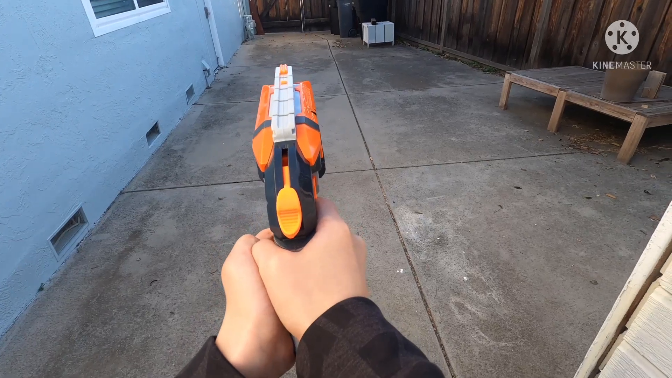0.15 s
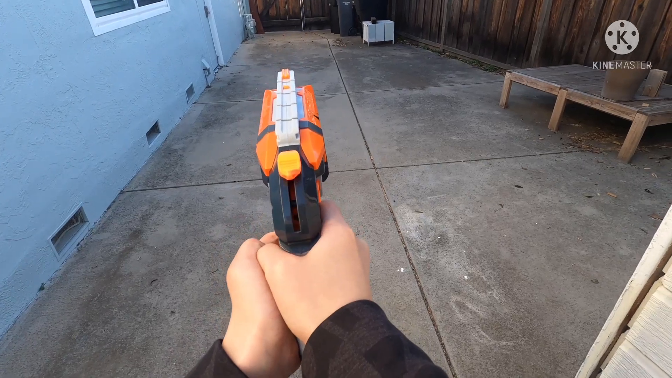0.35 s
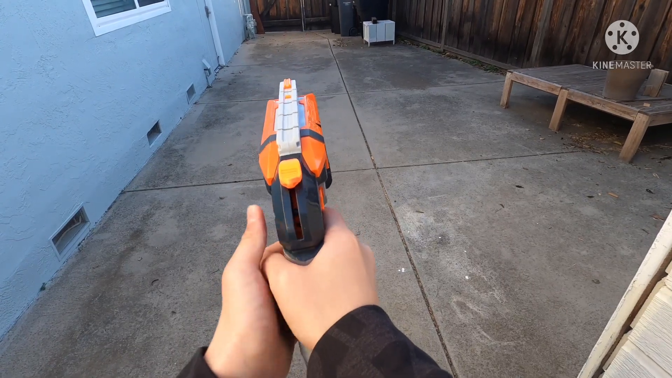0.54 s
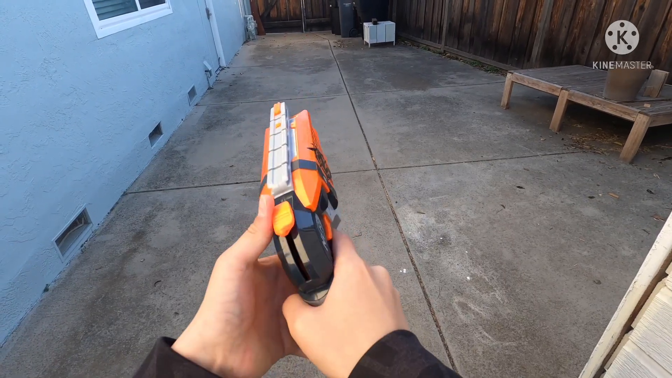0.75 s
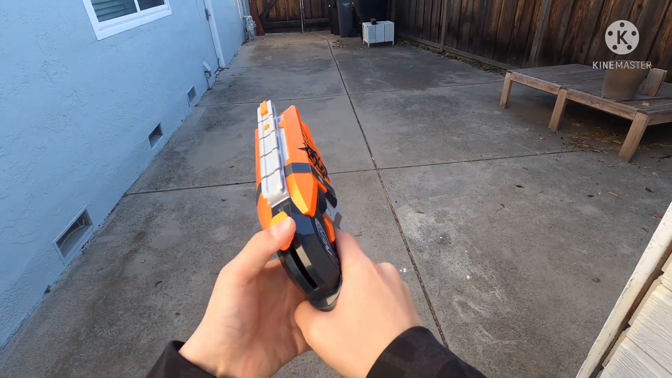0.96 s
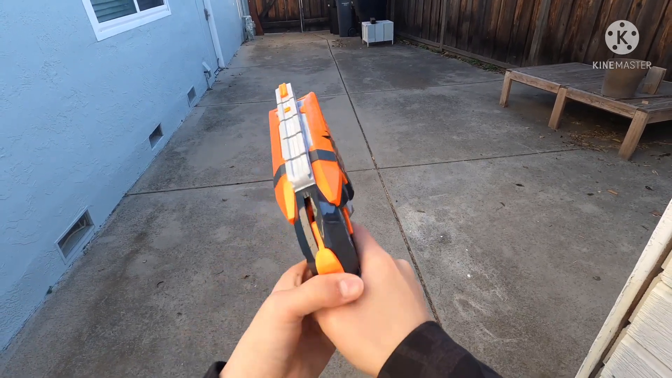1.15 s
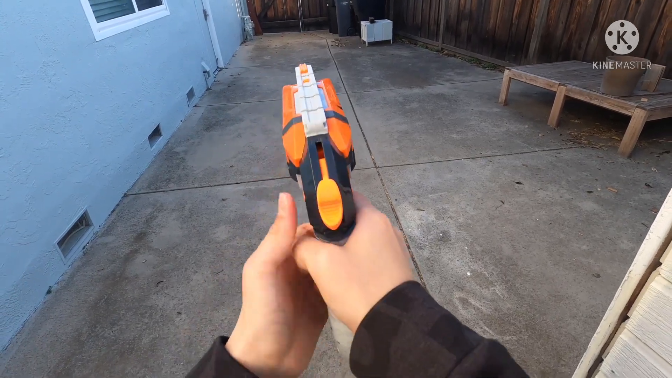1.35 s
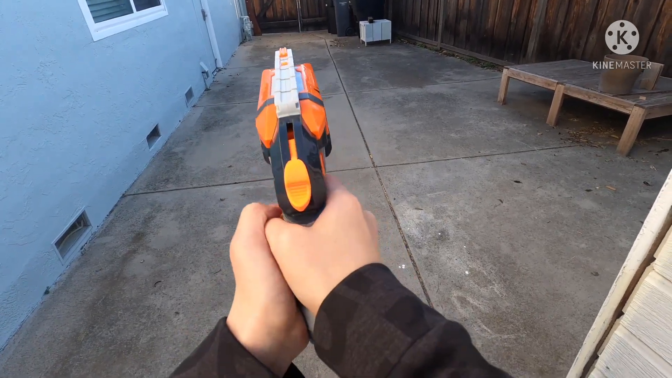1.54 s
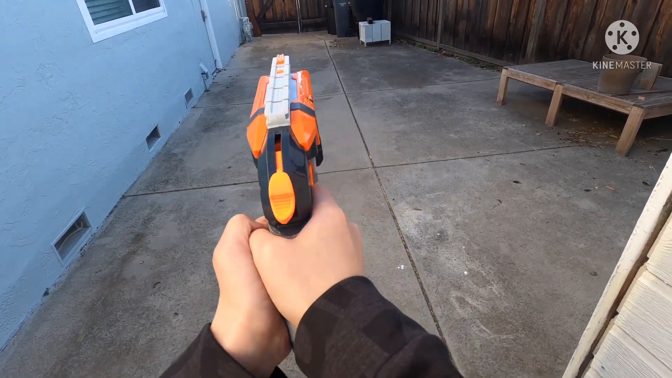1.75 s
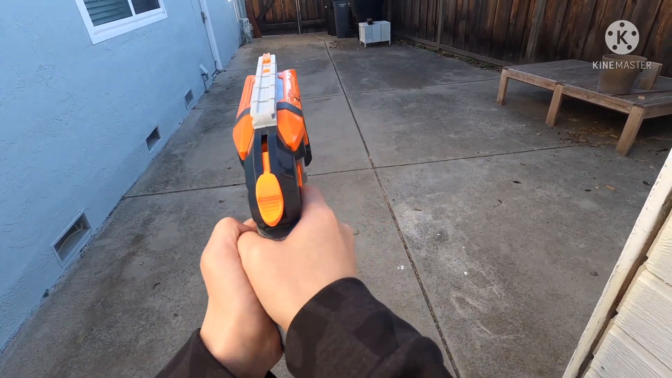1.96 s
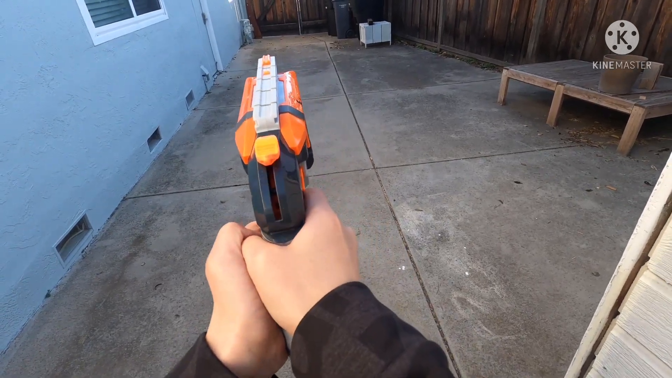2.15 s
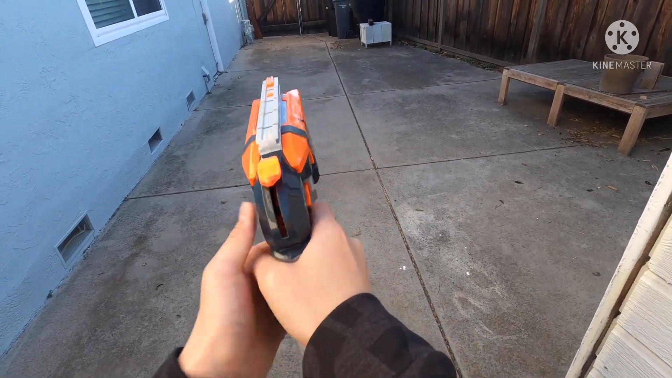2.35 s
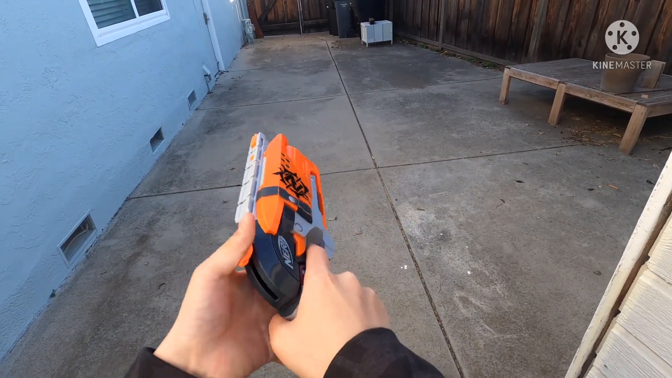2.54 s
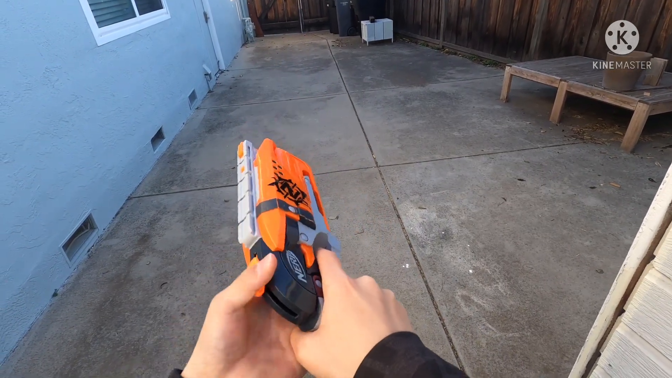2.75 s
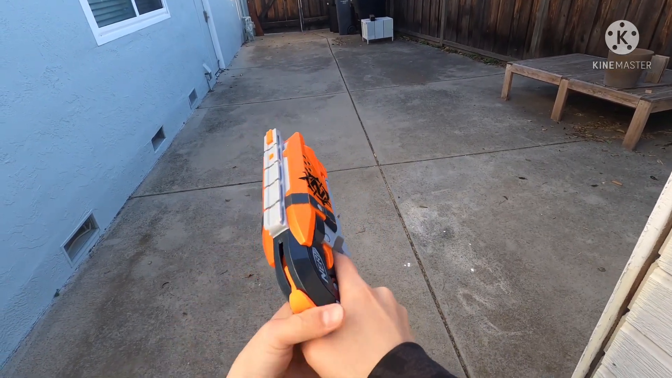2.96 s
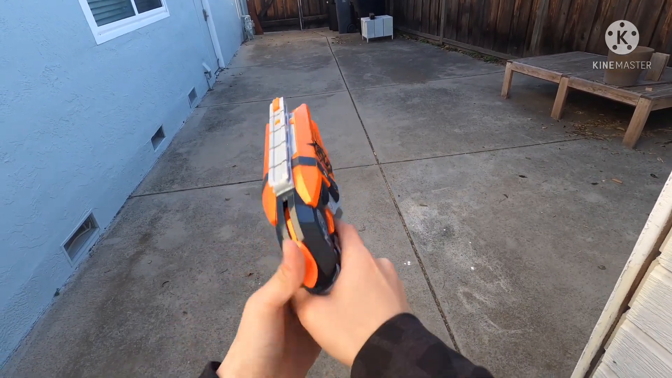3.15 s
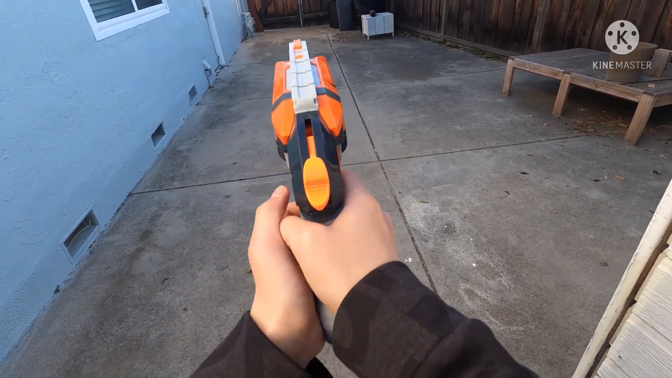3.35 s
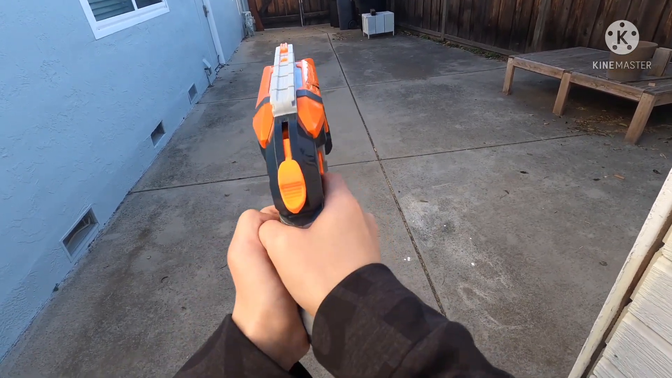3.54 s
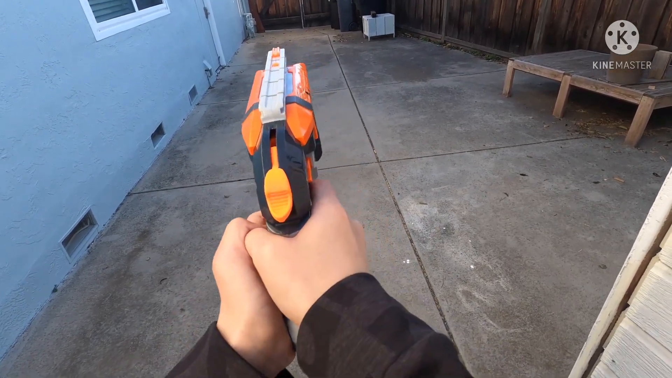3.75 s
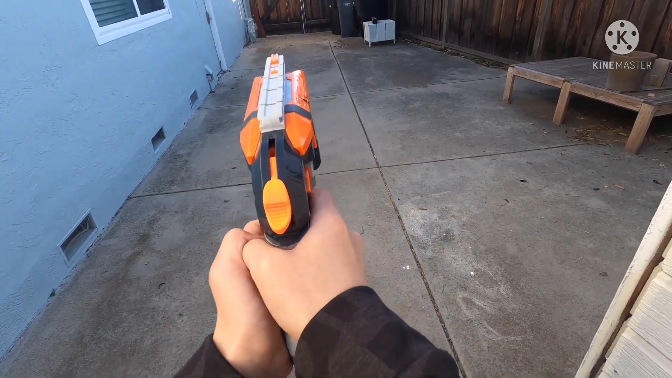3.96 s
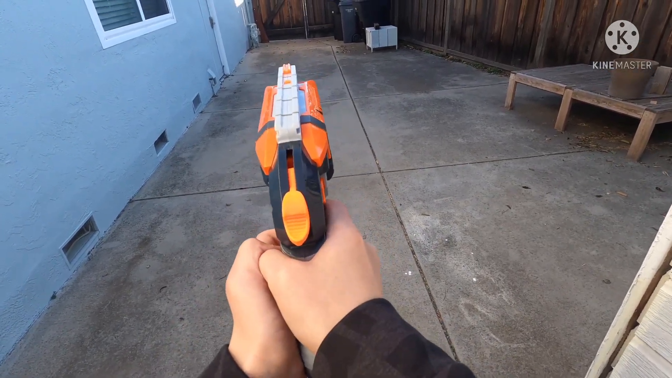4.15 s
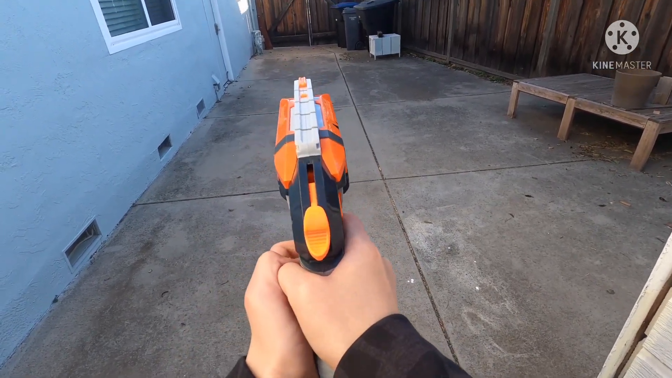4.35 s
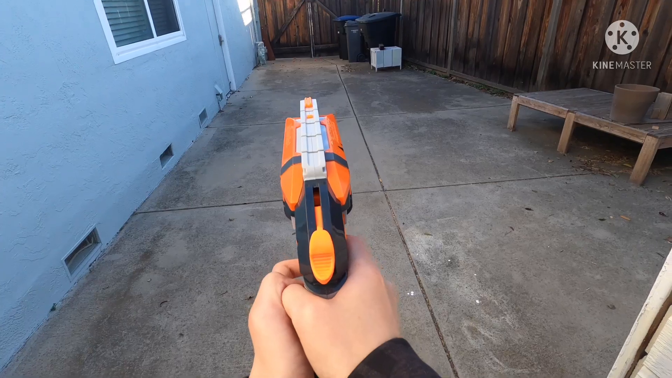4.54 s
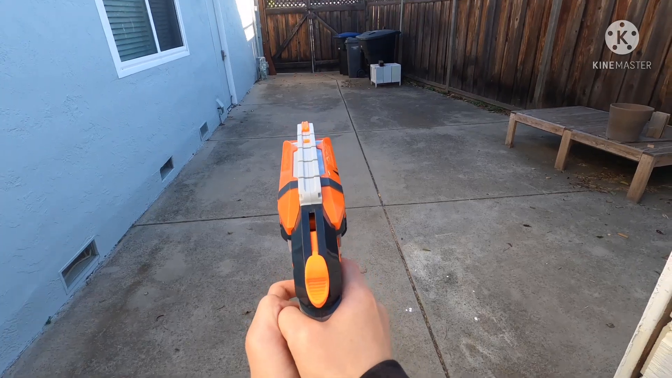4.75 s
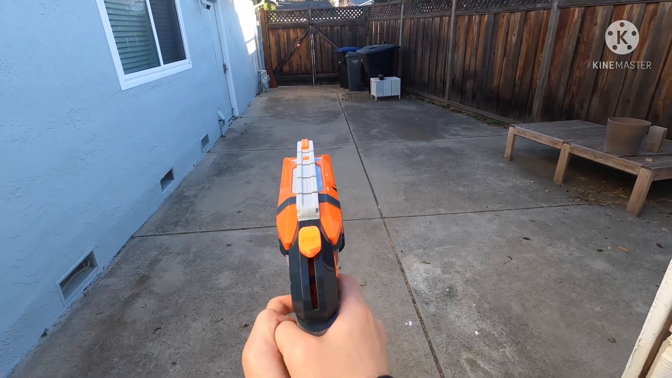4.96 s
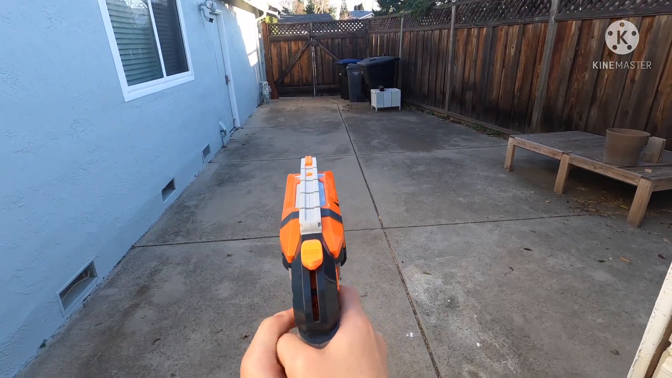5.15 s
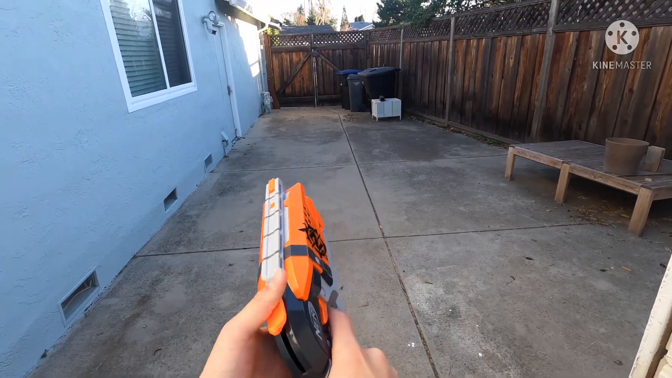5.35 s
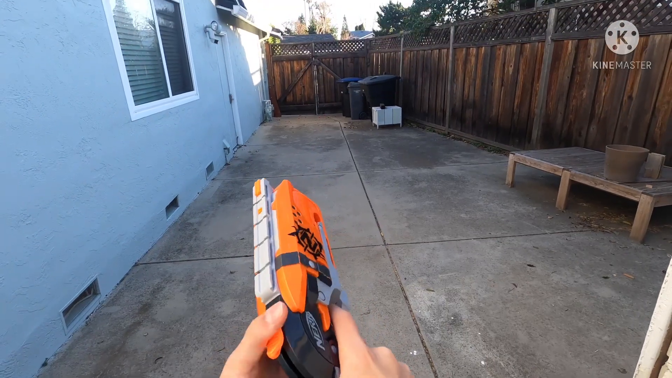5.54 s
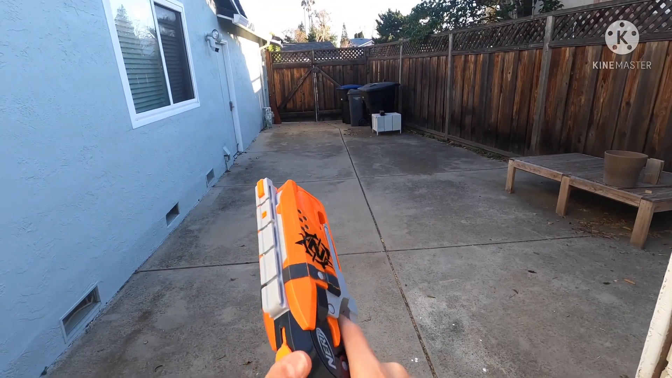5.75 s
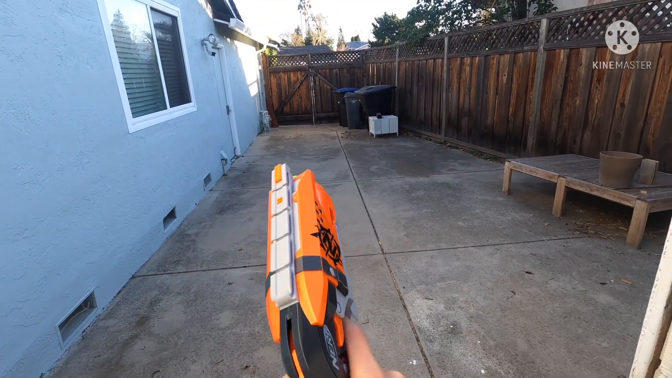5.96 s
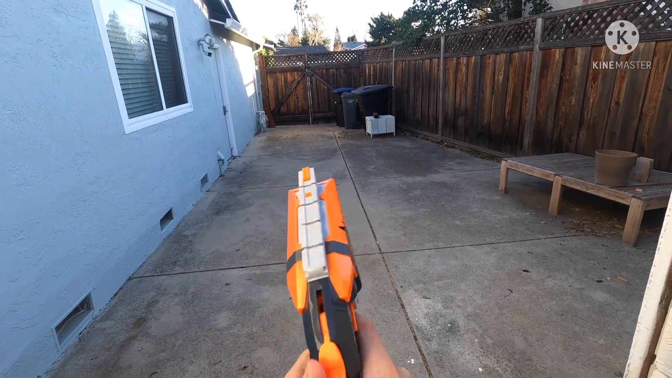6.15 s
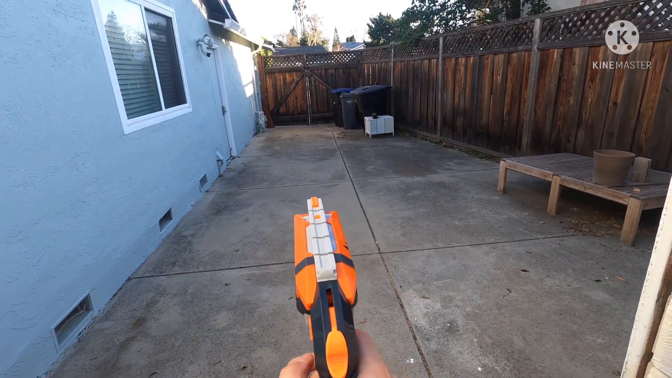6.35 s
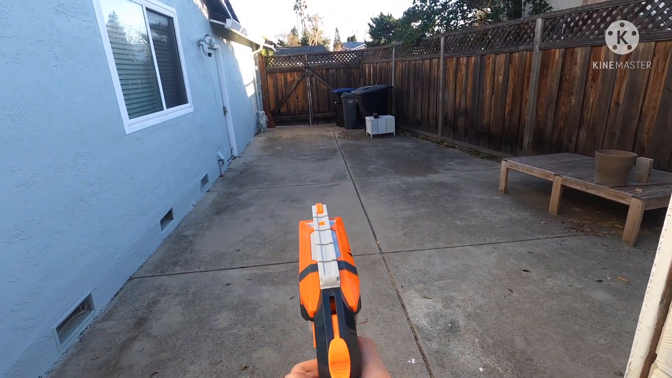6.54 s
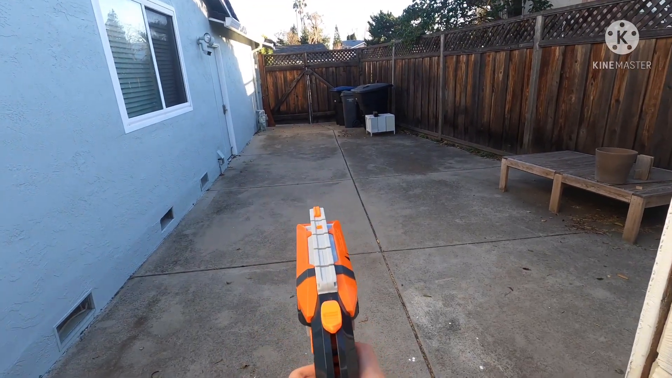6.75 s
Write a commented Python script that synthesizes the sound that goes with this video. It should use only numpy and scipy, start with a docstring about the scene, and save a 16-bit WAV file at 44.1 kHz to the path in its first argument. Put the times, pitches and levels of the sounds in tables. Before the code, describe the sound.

A plastic dart blaster at arm's length, slightly right of a stereo microphone: four loud snaps, each a crack, low puff and plunger slam almost fused. After each of the first three, soft grip rubbing, small rattles, a short rasping pull and a bright clack. A wall on the left and fences return brief, diffuse echoes over quiet distant traffic.

```python
"""A spring-powered foam-dart blaster is fired four times and cocked three times, at arm's length in a paved yard.
Each shot is a sear crack, a pulse of pumped air and the slam of the plunger, made of noise bursts and shell modes.
The slide groans and scrapes by stick and slip, then latches; parts knock lightly and hands rub the grip.
House wall and fence answer as decaying noise, over a town of filtered noise and drones, and one bird chirp.
A microphone pair hears the blaster slightly to its right and the house wall on its left."""
import sys
import numpy as np
from scipy import signal
from scipy.fft import rfft, irfft, next_fast_len
from scipy.io import wavfile
from scipy.ndimage import uniform_filter1d

SR = 44100
rng = np.random.default_rng(int(sys.argv[2]) if len(sys.argv) > 2 else 0)


def materialize(psi):
    """Save the field psi as 16-bit PCM at rate SR to the path in sys.argv[1].

    A 1-D psi becomes a single channel; in a 2-D psi each row is a channel.
    """
    bounded = np.clip(np.atleast_2d(psi).T, -1, 1)
    quanta = np.round(bounded * 32767).astype(np.int16)
    wavfile.write(sys.argv[1], SR, quanta)


N = 304287
TIME = np.arange(N) / SR  # seconds of the whole scene
BLOW = np.arange(4096) / SR  # seconds of one short blow

# Shots: start_s, crack_db, plunger_stop_db
SHOT_EVENTS = [(0.3789, -9.5, -14), (2.203, -9, -14.5), (5.0293, -9, -18), (6.7229, -11.5, -17)]
# Spectra of the sear's crack, the plunger's stop and small plastic ticks: freq_hz, level_db
CRACK_SPECTRUM = [(100, -18.5), (700, -19.5), (1300, -1), (2000, 3.5), (3200, -1.5), (5000, -0.5),
                  (9000, -15), (12000, -20), (16000, -32)]
SLAM_SPECTRUM = [(100, -13.5), (280, -8.5), (400, 4.5), (500, -5.5), (850, 6), (1300, 3.5), (2000, -3.5),
                 (3500, -3), (6000, -10.5), (9000, -13), (12000, -20.5), (16000, -43.5)]
TICK_SPECTRUM = [(100, -17), (500, -22.5), (1200, 7), (2200, 1), (3500, 0), (6000, -5), (9000, -12.5),
                 (12000, -26.5), (16000, -31.5)]
LEAD_IN_S = .03  # length of the swelling noise before the crack
TRAVEL_S = .0093  # from the crack to the plunger's stop


def shots(trigger_db=-24, rush_db=-20, lead_in_db=-33):
    """A faint noise swells into each crack of the sear; the trigger ticks, the plunger rushes and is stopped dead."""
    out = np.zeros((2, N))
    air = air_pulse()
    for s, crack_db, slam_db in SHOT_EVENTS:
        add(out, s - LEAD_IN_S, undb(lead_in_db) * lead_in(LEAD_IN_S, 0.0075))
        add(out, s - .005, undb(trigger_db) * knock(TICK_SPECTRUM, 0.0022, -15, .005, 0))
        add(out, s, undb(crack_db) * knock(CRACK_SPECTRUM, 0.0011, -22, .007, -4.0))
        hiss = unit(colour(pair(len(BLOW), 11000), SLAM_SPECTRUM))
        add(out, s + 0.003, undb(rush_db) * swell(0.0065) * hiss)
        add(out, s, air)
        add(out, s + TRAVEL_S, undb(slam_db) * knock(SLAM_SPECTRUM, 0.00065, -14.5, 0.0099, -8))
    return out


def air_pulse(air_hz=142, air_db=-11.0):
    """The pumped air swings about twice in the barrel; the plunger's dead stop adds a sharp suction."""
    out = np.zeros((2, N))
    swing = swell(.0052) * np.sin(2 * np.pi * air_hz * BLOW)
    add(out, .0026, -undb(air_db) * swing)
    add(out, TRAVEL_S, -undb(-5) * swell(.00045))
    return out[:, :len(BLOW)]


# Pulls of the slide: start_s, latch_s, seal_groan_db, rail_scrape_db, catch_db
SLIDE_PULLS = [(1.138, 1.2974, -22, -43.5, -17.5), (2.965, 3.0886, -39, -47, -17),
               (5.819, 6.0799, -33, -53.5, -15)]
# Places where the slide binds and rasps: start_s, length_s, level_db
RASP_EVENTS = [(1.213, 0.014, -36), (1.338, 0.048, -43), (2.959, 0.047, -40.5), (5.988, 0.049, -43.5),
               (6.196, 0.015, -36.5)]
# Spectra of the juddering seal and the scraping rails: freq_hz, level_db
SEAL_SPECTRUM = [(80, -8.5), (200, -2.5), (380, -1.5), (700, -9.5), (1050, 6.5), (1500, -2), (1900, -11),
                 (3000, -20), (8000, -46.5)]
RAIL_SPECTRUM = [(150, -19.5), (450, -11), (600, 7), (800, -10), (1200, 7.5), (1600, 5.5), (2200, -1.5),
                 (3100, -3.5), (3480, 0), (3950, -6), (4500, -4), (5200, -5.5), (9000, -17.5),
                 (12000, -23.5), (16000, -38)]
GRAB_S, SEAL_FALL_DB_PER_S, SEAL_GLIDE_DB = 0.0025, 151.5, -20  # the seal breaks loose, then glides more quietly
STRAIN_DB, STRAIN_S = 15.5, 0.013  # extra scrape and its 1/e time either side of the latch
RETURN_S, RELEASE_S = 0.062, 0.026  # the slide runs on after the latch, then comes to rest


def slide(rasp_attack_s=0.0014, rasp_release_s=0.0089, breakaway_db=1):
    """The seal tocks loose and judders in the air tube; the rails scrape hardest at full spring load and bind."""
    seal = slips(520, 1.2, SEAL_SPECTRUM, 0.0011, -3.5, uneven=.25)
    rail = through_shell(slips(260, 2.6, RAIL_SPECTRUM, 0.0028, 11.0))
    groan, scrape = np.zeros((2, N))
    tocks = np.zeros((2, N))
    for start, latch, seal_db, rail_db, _ in SLIDE_PULLS:
        add(tocks, start, undb(seal_db + breakaway_db) * knock(SEAL_SPECTRUM, 0.0018, -16, .008, -8.5))
        moving = gate(start, latch + RETURN_S, GRAB_S, RELEASE_S)
        loosening = undb(-SEAL_FALL_DB_PER_S * np.maximum(TIME - start, 0))
        groan += moving * undb(seal_db) * np.hypot(loosening, undb(SEAL_GLIDE_DB))
        strain = 1 + undb(STRAIN_DB) * np.exp(-np.abs(TIME - latch) / STRAIN_S)
        scrape += moving * undb(rail_db) * strain
    for start, length, db in RASP_EVENTS:
        scrape += undb(db) * gate(start, start + length, rasp_attack_s, rasp_release_s)
    return tocks + seal * groan + rail * scrape


# Spectrum of the catch dropping in: freq_hz, level_db
LATCH_SPECTRUM = [(100, -17), (400, -16), (650, -2.5), (1300, 5.5), (2200, -7), (3500, 4), (5000, -7.5),
                  (9000, -13), (12000, -16.5), (16000, -34)]
RAMP_LEAD_S, REBOUND_S, SETTLE_S = 0.02, .0092, .026  # blows before and after the catch


def latches(ramp_db=-13, rebound_db=-2.0, settle_db=-11):
    """The catch ticks onto its ramp and drops in; the spring throws the plunger back at it, and it settles."""
    out = np.zeros((2, N))
    for _, s, _, _, db in SLIDE_PULLS:
        add(out, s - RAMP_LEAD_S, undb(db + ramp_db) * knock(TICK_SPECTRUM, .002, -11.5, .007, -2.5))
        catch = knock(LATCH_SPECTRUM, 0.0021, -18.5, 0.0095, -8.5, build_s=0.00027)
        add(out, s, undb(db) * catch)
        add(out, s + REBOUND_S, undb(db + rebound_db) * knock(LATCH_SPECTRUM, 0.00097, -9, .008, -2.0))
        add(out, s + SETTLE_S, undb(db + settle_db) * knock(TICK_SPECTRUM, .0015, -13.5, 0.0078, 2.5))
    return out


# Plastic knocks of slide, trigger and grip: start_s, peak_db, treble_share_db
CLICK_EVENTS = [(0.731, -45, -8.5), (0.819, -32, -14), (0.8432, -42.5, -3), (1.0998, -43, -7),
                (1.1239, -34, -3), (1.189, -30.5, -2.5), (1.2426, -29.5, -5.5), (1.381, -31, -16),
                (1.405, -34.5, -11), (1.5794, -38, -9.5), (2.1135, -41, -21), (2.5175, -38, -13),
                (2.639, -39.5, -11.5), (2.6664, -44, -15.5), (2.8291, -35, -16), (2.908, -38.5, -26),
                (2.9301, -28.5, -24.5), (3.028, -33, -23), (3.1954, -29.5, -12.5), (3.2147, -30, -16),
                (3.3255, -36, -7), (3.381, -37.5, -22), (3.6522, -42, 21), (4.9055, -27, -6),
                (5.4874, -48, -30), (5.581, -35.5, -8.5), (5.715, -48, -23.5), (5.803, -32.5, -13.5),
                (5.8348, -38, 10), (5.908, -27, -32.5), (5.9417, -35.5, -6.5), (6.0192, -30.5, 5),
                (6.0483, -29, -10), (6.1367, -25.5, -14), (6.214, -28.5, -23), (6.2331, -33, -15),
                (6.3178, -32.5, -8.5)]


def clicks(usual_db=-6, lead_in_db=-19, lead_in_s=0.0087):
    """Small blows on plastic, each led in by a brief, faint swell of noise; a harder contact is brighter."""
    out = np.zeros((2, N))
    for s, db, treble_db in CLICK_EVENTS:
        blow = knock(TICK_SPECTRUM, 0.001428, -13.0, .007, -5.5, build_s=0.00025)
        # a larger treble share lowers everything below 1600 Hz
        blow = colour(blow, [(1600, usual_db - treble_db), (5000, 0.013)])
        add(out, s, undb(db) * peak(blow))
        add(out, s - lead_in_s, undb(db + lead_in_db) * lead_in(lead_in_s, 0.0062))
    return out


# Hands shifting on the grip: start_s, end_s, level_db
HAND_SHIFTS = [(0.62, 0.897, -65.5), (1.03, 1.451, -60), (2.504, 2.954, -65), (3.19, 3.616, -65),
               (5.297, 5.805, -62.5), (6.217, 6.473, -70)]
# Spectrum of skin rubbing on plastic: freq_hz, level_db
SKIN_SPECTRUM = [(150, -10), (600, -1.5), (1400, 5), (3000, -12.5), (6000, -19.5), (12000, -30.5)]


def hands(tick_db=12, scatter_db=2.0, count=3):
    """Skin rubs softly on the grip as the hands shift, and loose parts tick a few times."""
    touch = np.zeros(N)
    for start, end, db in HAND_SHIFTS:
        touch += undb(db) * np.clip(np.minimum(TIME - start, end - TIME) / 0.051, 0, 1)
    pressure = undb(5.2 * wander(count=200))
    out = touch * pressure * slips(160, 3.2, SKIN_SPECTRUM, 0.0044, 16)
    for start, end, db in HAND_SHIFTS:
        for k in range(count):
            s = start + (end - start) * (k + rng.random()) / count
            level_db = db + tick_db + scatter_db * rng.standard_normal()
            add(out, s, undb(level_db) * knock(TICK_SPECTRUM, 0.0015, -25.5, .006, -1.5))
    return out


# Spectrum of the sound returned by the yard: freq_hz, level_db
YARD_SPECTRUM = [(50, -22.5), (130, -3), (300, 0.5), (700, 8.5), (1300, 2.5), (2500, 4.5), (5000, 0),
                 (8000, 0), (12000, -6.5), (16000, -28.5)]


def yard(x, low_t60=0.47, high_t60=0.38, near_db=-16, far_db=-20.0, near_s=0.018, build_s=0.079):
    """Ground and house wall scatter early; the fences answer later and keep the sound going."""
    t = np.arange(SR) / SR
    noise = pair(SR, 2800)
    low = signal.sosfilt(signal.butter(1, 2500, fs=SR, output="sos"), noise)
    decay = low * undb(-60 * t / low_t60) + (noise - low) * undb(-60 * t / high_t60)
    far = decay * np.minimum(t / build_s, 1) ** 2
    near = pair(SR, 4000) * np.exp(-t / near_s) * (t > .009)
    both = undb(near_db) * unit(near) + undb(far_db) * unit(far)
    response = colour(both, YARD_SPECTRUM) / np.sqrt(SR)
    return signal.fftconvolve(x, response, axes=1)[:, :N]


def wall_echo(x, echo_db=-15, lag_s=0.036, again_db=-8, dull_hz=220):
    """The bass of a shot bounces between house and fence: one return, then a weaker one."""
    out = np.zeros((2, N))
    bass = undb(echo_db) * signal.sosfilt(signal.butter(2, dull_hz, fs=SR, output="sos"), x)
    add(out, lag_s, bass)
    add(out, lag_s + .034, undb(again_db) * bass)
    return out


CHIRP_S, CHIRP_LENGTH_S, CHIRP_HZ, CHIRP_DROP_HZ, CHIRP_DB = 1.536, 0.095, 5540, 1400, -56.5


def bird(echo_db=16, waver=.03, flutter_db=4.5):
    """One chirp from beyond the fence: a wavering sine falling ever faster, mostly echo."""
    age = np.clip((TIME - CHIRP_S) / CHIRP_LENGTH_S, 0, 1)
    hz = (CHIRP_HZ - CHIRP_DROP_HZ * age ** 1.7) * (1 + waver * age * wander(count=5000))
    loudness = undb(CHIRP_DB + flutter_db * wander(count=3000)) * np.sin(np.pi * age) ** 2
    note = loudness * np.sin(2 * np.pi * np.cumsum(hz) / SR)
    echo = yard(note[None], low_t60=.36, high_t60=0.43, near_db=-14, build_s=.05)
    return note + undb(echo_db) * echo


# Spectrum of the distant town: freq_hz, level_db
TOWN_SPECTRUM = [(15, -29.5), (25, 0), (41, 5.5), (60, -3), (87, -1), (129, -12), (164, -13.5), (192, -22),
                 (372, -23), (414, -26.5), (498, -29), (703, -34), (1260, -30), (1820, -40.5), (2940, -48),
                 (4370, -59.5), (14000, -82)]
# Swells of the town: middle_s, half_length_s (to 1/e of the rise), rumble_rise_db, traffic_rise_db
TOWN_SWELLS = [(.6, 0.44, 6, -2.5), (1.75, 0.35, 2.5, 1), (4.2, 1, 2, 2)]
# Far machines droning: start_s, end_s, pitch_hz, level_db
MACHINE_DRONES = [(.9, 2.4, 376, -59), (4.5, 6.9, 81, -53), (4.5, 8.1, 165, -59.5)]
RUMBLE_DB, TRAFFIC_DB = -48, -56.5  # before the swells and the wavering


def town(rumble_waver_db=1.0, traffic_waver_db=1.18):
    """Low rumble and distant traffic, as filtered noise, swell slowly; far machines drone for a while."""
    rises_db = np.zeros((2, N))
    for s, half, *rise in TOWN_SWELLS:
        rises_db += np.outer(rise, np.exp(-((TIME - s) / half) ** 2))
    rumble_rise_db, traffic_rise_db = rises_db
    air = colour(pair(N, 1400), TOWN_SPECTRUM, size=8192)
    low = signal.sosfiltfilt(signal.butter(3, 170, fs=SR, output="sos"), air)
    rumble_walk, traffic_walk, pitch_walk = [wander(count=50) for _ in range(3)]
    out = unit(low) * undb(RUMBLE_DB + rumble_rise_db + rumble_waver_db * rumble_walk)
    out += unit(air - low) * undb(TRAFFIC_DB + traffic_rise_db + traffic_waver_db * traffic_walk)
    for start, end, hz, db in MACHINE_DRONES:
        fade = np.clip(np.minimum(TIME - start, end - TIME) / .3, 0, 1)
        phase = 2 * np.pi * np.cumsum(hz * (1 + 0.0043 * pitch_walk)) / SR
        out += np.sqrt(2) * undb(db) * fade * np.sin(phase)
    return out


# Ringing modes of the plastic shell: pitch_hz, level_db, t60_s
SHELL_MODES = [(1004, -3, .035), (1193, 1, .04), (1324, 2.5, 0.036), (1535, 1.5, 0.016),
               (1765, -3.5, 0.018), (1947, -5.5, 0.024), (2254, -3.5, 0.027), (2420, -9, .03),
               (2850, -6.5, 0.032), (3100, -2, .025), (3440, -1, 0.013), (4222, -9.5, 0.015),
               (4600, -10.5, 0.013), (5600, -12, 0.025), (6720, -17, .02), (8670, -12.5, .03)]


def knock(spectrum, contact_s, rattle_db, rattle_s, ring_db, build_s=0.00035):
    """One blow on the shell: a short crack, a buzz of loose parts, and modes that differ from blow to blow."""
    burst = np.exp(-BLOW / contact_s) + undb(rattle_db) * np.exp(-BLOW / rattle_s)
    crack = colour(pair(len(BLOW), 8300) * burst, spectrum)
    hz, db, t60 = np.transpose(SHELL_MODES)[:, :, None]
    # where the blow lands decides how strongly, and with which sign, each mode rings
    detune, strength, side = rng.standard_normal((3, len(SHELL_MODES), 1))
    ringing = np.sin(2 * np.pi * hz * (1 + 0.005 * detune) * BLOW)
    modes = np.sign(side) * undb(db + 2 * strength - 60 * BLOW / t60) * ringing
    blow = peak(crack) + undb(ring_db) * peak(modes.sum(axis=0)[None])
    return peak(blow * (1 - np.exp(-BLOW / build_s)))


def through_shell(x, ring_db=-8):
    """Friction also sets the shell's modes ringing."""
    hz, db, t60 = np.transpose(SHELL_MODES)[:, :, None]
    modes = (undb(db - 60 * BLOW / t60) * np.cos(2 * np.pi * hz * BLOW)).sum(axis=0)
    ringing = signal.fftconvolve(x, modes[None], axes=1)[:, :N]
    return unit(x + undb(ring_db) * unit(ringing))


def slips(rate_hz, scatter_db, spectrum, grain_s, crunch_db, uneven=.45):
    """Stick and slip: unevenly spaced jerks of uneven strength, each a tiny crunch."""
    chance = rng.standard_normal((int(8 * rate_hz), 2))
    gaps = np.exp(uneven * chance[:, 0]) * SR / rate_hz  # in samples
    where = np.cumsum(gaps).astype(int)
    jerks = np.bincount(where, undb(scatter_db * chance[:, 1]), N)[None, :N]
    crunch = signal.lfilter([1], [1, -np.exp(-1 / (grain_s * SR))], jerks)
    grains = unit(crunch * pair(N, 6000))
    return unit(colour(unit(jerks) + undb(crunch_db) * grains, spectrum))


def lead_in(length_s, rise_s):
    """Noise that swells quickly and stops where the blow begins."""
    t = BLOW[BLOW < length_s]
    return peak(colour(pair(len(t), 9000) * np.exp((t - length_s) / rise_s), RAIL_SPECTRUM))


def swell(rise_s):
    """A push that rises to 1 at rise_s and dies away."""
    return (BLOW / rise_s * np.exp(1 - BLOW / rise_s))[None] ** 2


def gate(start, end, attack_s, release_s):
    """Rise from start, hold until end, die away."""
    attack = 1 - np.exp(-np.maximum(TIME - start, 0) / attack_s)
    return attack * np.exp(-np.maximum(TIME - end, 0) / release_s)


def wander(count):
    """A smooth random walk of rms 1 through count random points, cut to the scene's length."""
    return unit(signal.resample(rng.standard_normal(count), next_fast_len(N, real=True))[:N])


def pair(count, apart_hz):
    """Two noises for left and right, alike in the bass and growing unrelated above apart_hz."""
    size = next_fast_len(count, real=True)
    mid, side = rfft(rng.standard_normal((2, size)))
    hz = np.fft.rfftfreq(size, 1 / SR)
    angle = np.pi / 4 * hz / np.hypot(hz, apart_hz)
    spectra = mid * np.cos(angle) + side * np.sin(angle) * np.array([[1], [-1]])
    return irfft(spectra, size)[:, :count]


def colour(x, spectrum, size=2048):
    """Causal minimum-phase filter, through the cepstrum, with the given spectrum in Hz and dB."""
    gain = undb(at(np.fft.rfftfreq(size, 1 / SR), *np.transpose(spectrum)))
    cep = irfft(np.log(gain))
    # fold the cepstrum so that the filter only looks back
    cep[1:size // 2] *= 2
    cep[size // 2 + 1:] = 0
    response = irfft(np.exp(rfft(cep)))
    return signal.fftconvolve(x, response[None], axes=1)[:, :x.shape[1]]


def at(hz, points, values):
    """Read a spectrum on a log-frequency axis."""
    return np.interp(np.log(hz + 1), np.log(points), values)


def undb(db):
    """Decibels to gain."""
    return 10 ** (np.asarray(db) / 20)


def unit(x):
    """Scale to rms 1."""
    return x / np.sqrt(np.mean(x ** 2))


def peak(x, size=44):
    """Scale so that the loudest millisecond has rms 1."""
    return x / np.sqrt(uniform_filter1d(np.mean(x ** 2, axis=0), size).max())


def add(out, s, x):
    """Mix x in at time s."""
    i = int(s * SR)
    out[:, i:i + x.shape[1]] += x[:, :N - i]


# The microphone pair: freq_hz, left_minus_right_db (blaster only), left_lead_rad
MICROPHONE_PAIR = [(100, 0, 0), (450, 0, -.06), (1200, .6, -.46), (3200, -.4, -.68), (7000, -4, -1.1),
                   (12000, -9, -1.2)]


def scene(wall_db=3.5, count=3):
    """The blaster sits slightly right of the microphones; the house wall makes the yard louder on the left."""
    fire = shots()
    cocking = clicks() + latches() + slide() + hands()
    blaster = fire + cocking
    # the shell radiates a different mix of modes in each direction, so the echo of a shot is smooth
    scattered = sum(yard(shots()) for _ in range(count)) / np.sqrt(count)
    around = scattered + undb(-2.5) * yard(cocking) + wall_echo(fire) + bird() + town()
    size = next_fast_len(N + SR // 10, real=True)
    hz = np.fft.rfftfreq(size, 1 / SR)
    points, pan_db, lead = np.transpose(MICROPHONE_PAIR)
    sides = np.array([[.5], [-.5]])  # left, right
    both = rfft(blaster, size) * undb(sides * at(hz, points, pan_db))
    both += rfft(around, size) * undb(sides * wall_db * hz / (hz + 300))
    return irfft(both * np.exp(1j * sides * at(hz, points, lead)), size)[:, :N]


TOP_HZ = 15500


def record(dry):
    """The recorder blocks slow drift, rounds the very highest peaks and cuts the top."""
    steady = signal.sosfilt(signal.butter(1, 20, "high", fs=SR, output="sos"), dry)
    rounded = steady / (1 + steady ** 6) ** (1 / 6)
    return signal.sosfilt(signal.ellip(8, .2, 70, TOP_HZ, fs=SR, output="sos"), rounded)


dry = scene()
out = record(dry)
materialize(out)
```